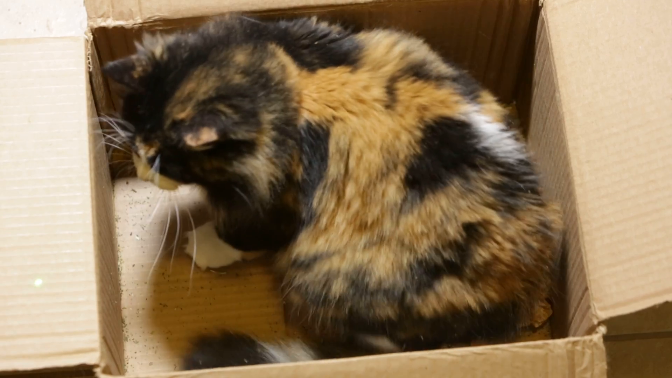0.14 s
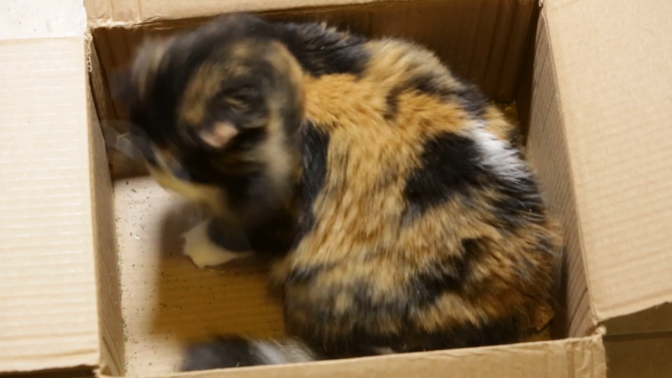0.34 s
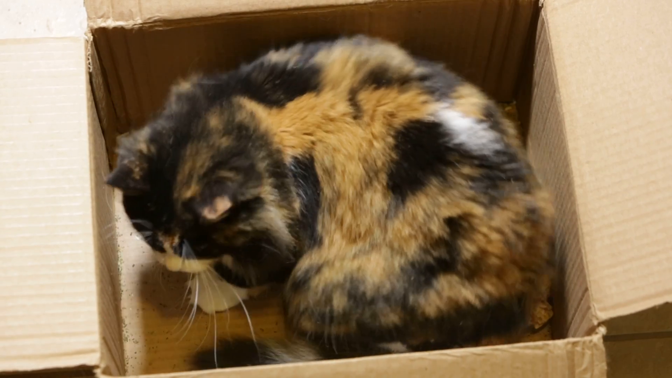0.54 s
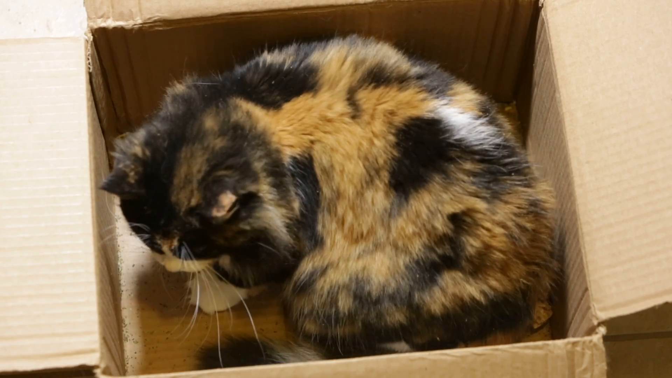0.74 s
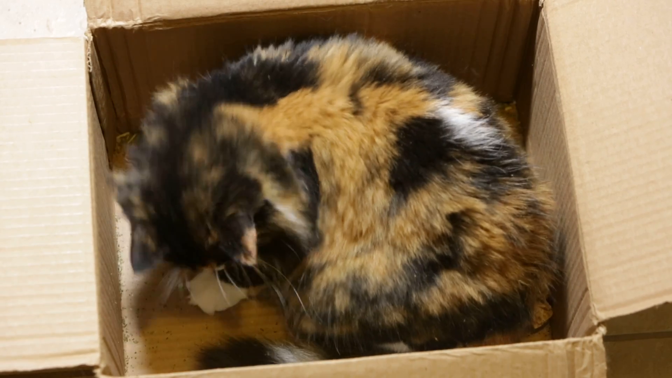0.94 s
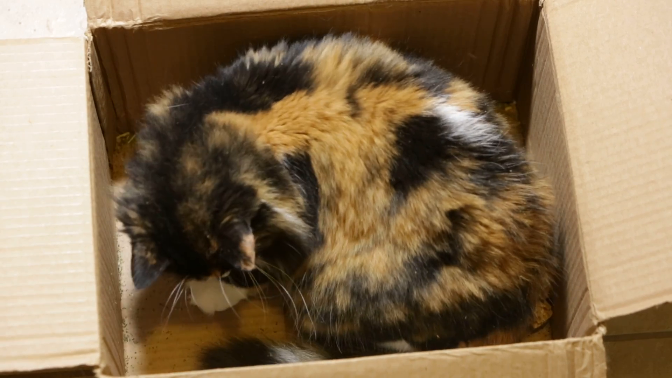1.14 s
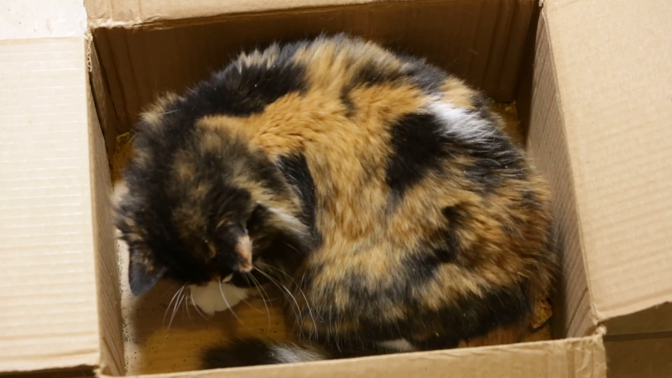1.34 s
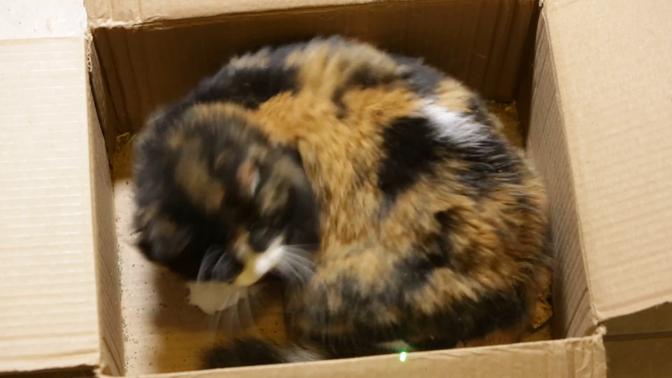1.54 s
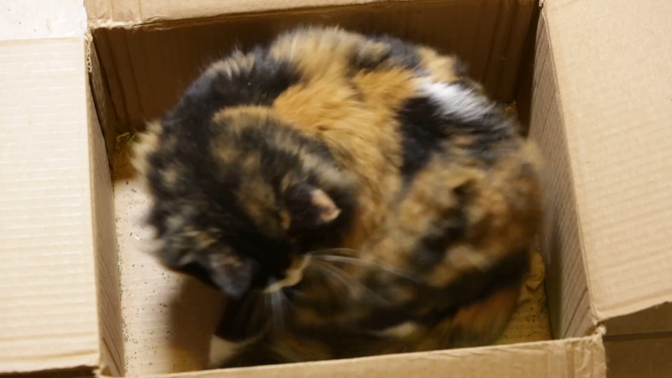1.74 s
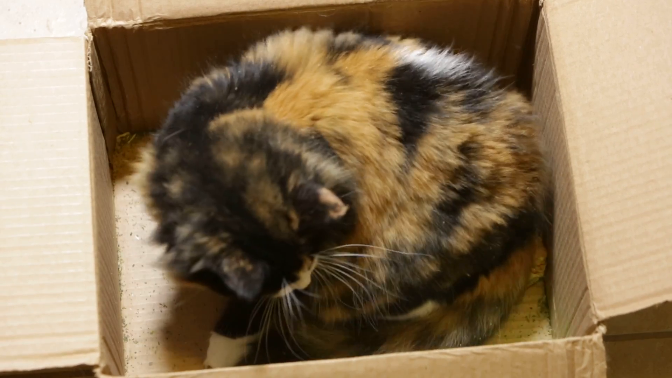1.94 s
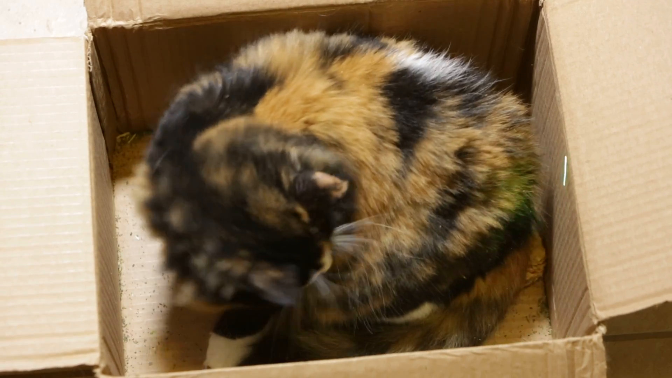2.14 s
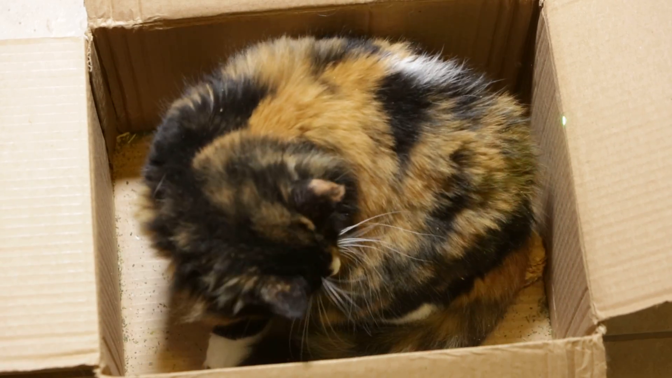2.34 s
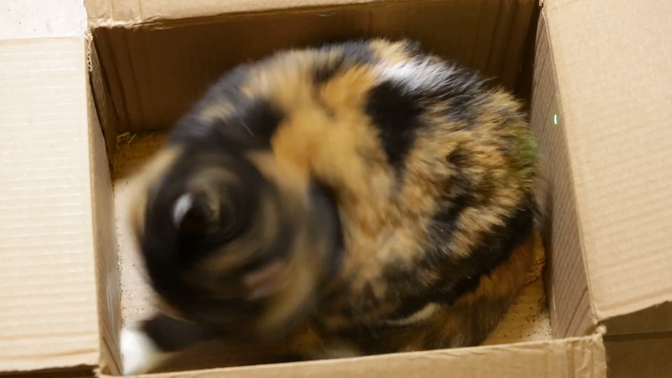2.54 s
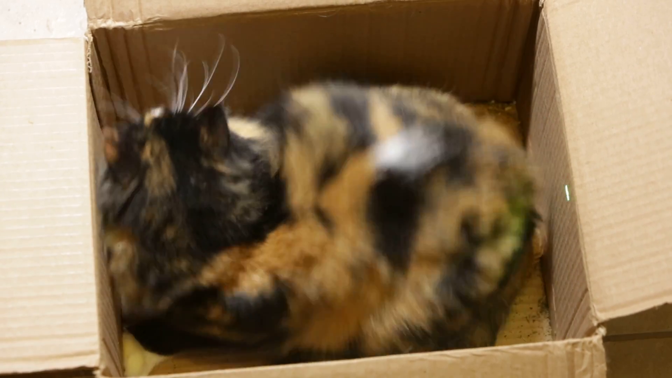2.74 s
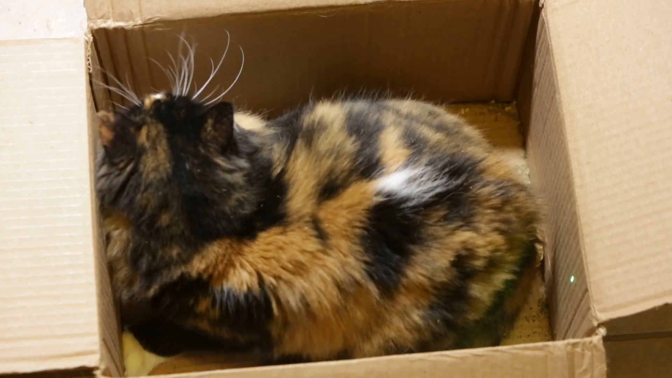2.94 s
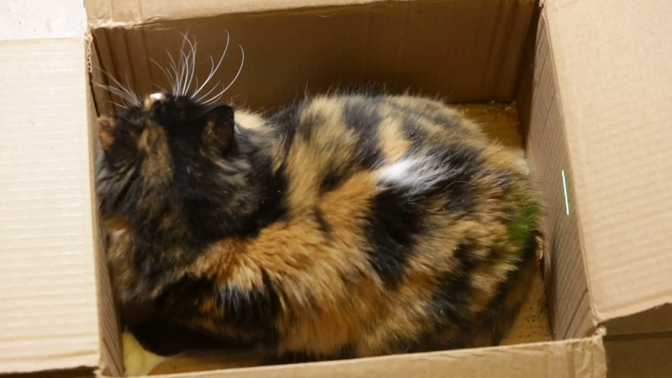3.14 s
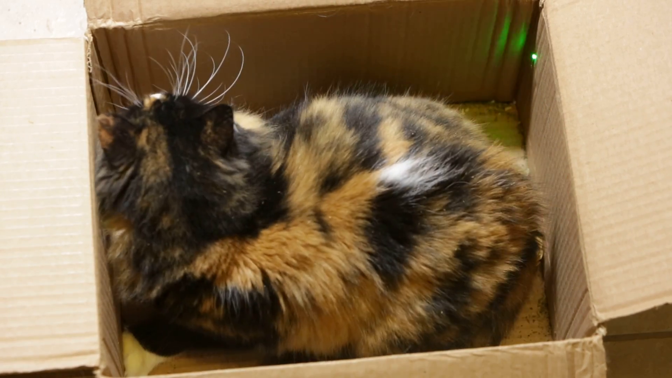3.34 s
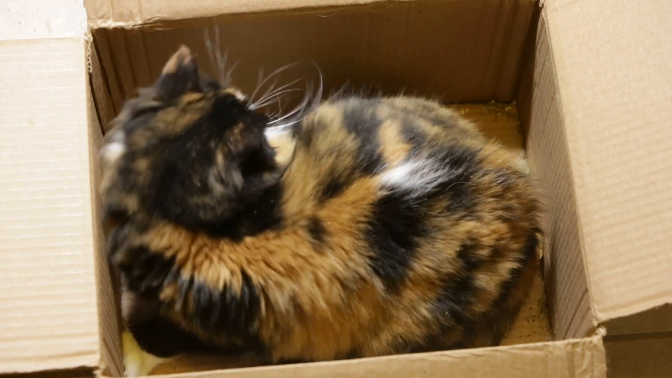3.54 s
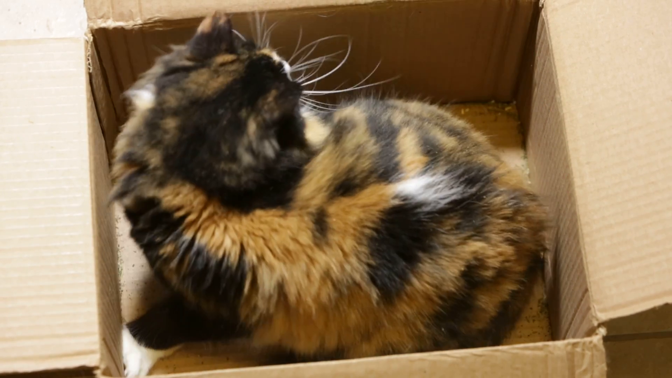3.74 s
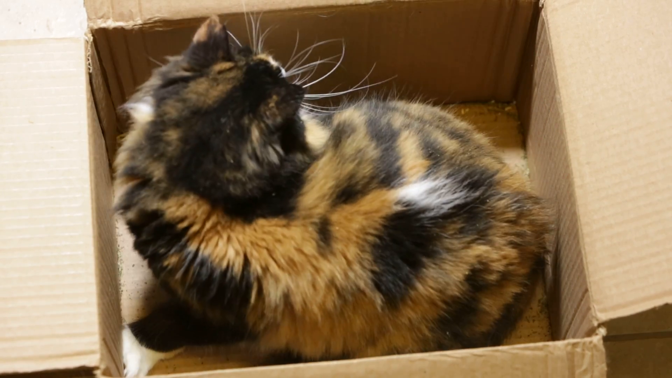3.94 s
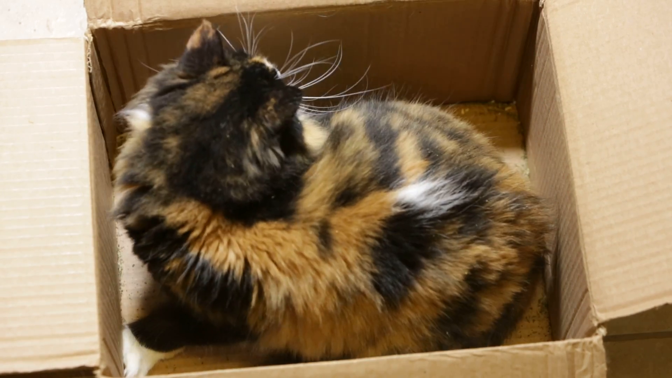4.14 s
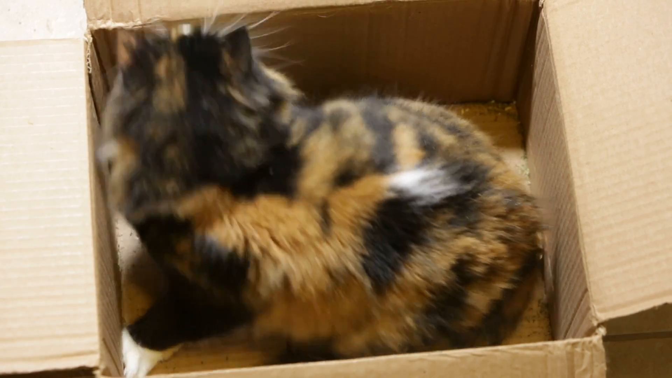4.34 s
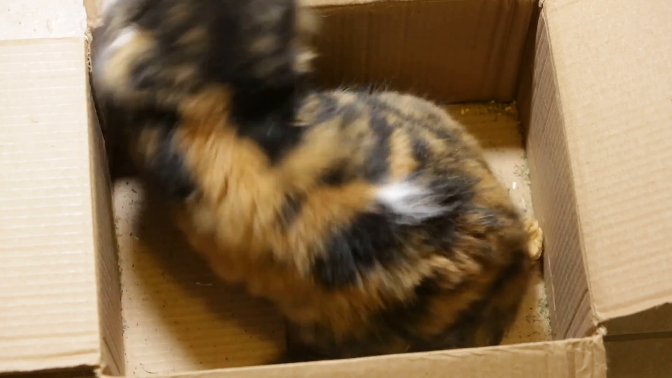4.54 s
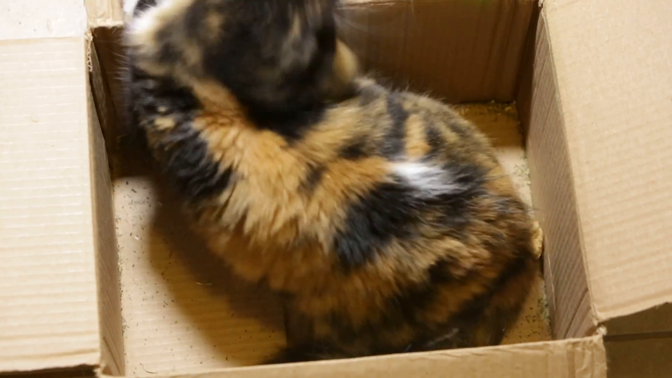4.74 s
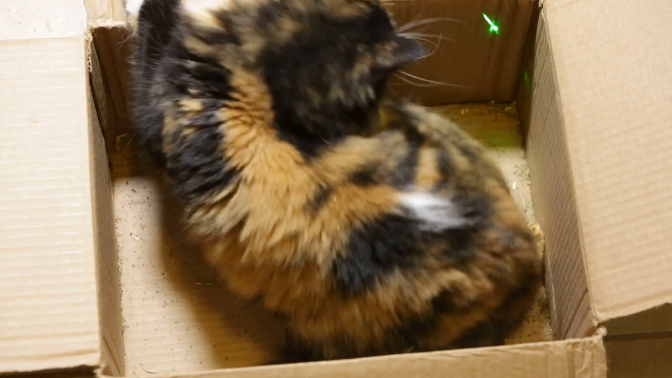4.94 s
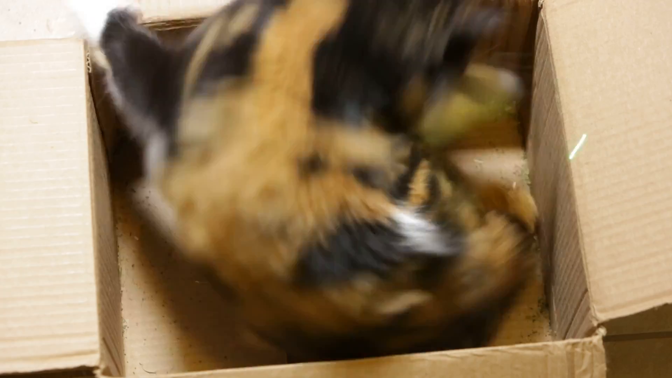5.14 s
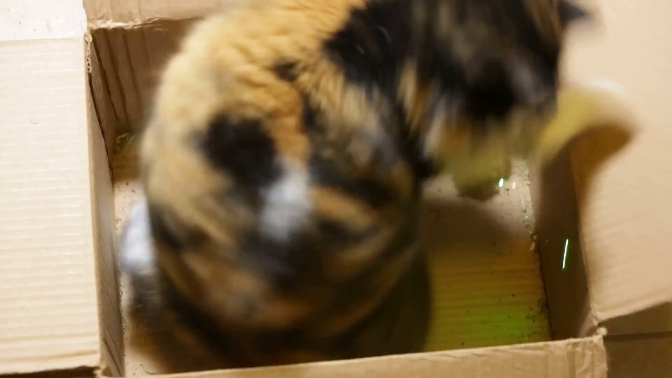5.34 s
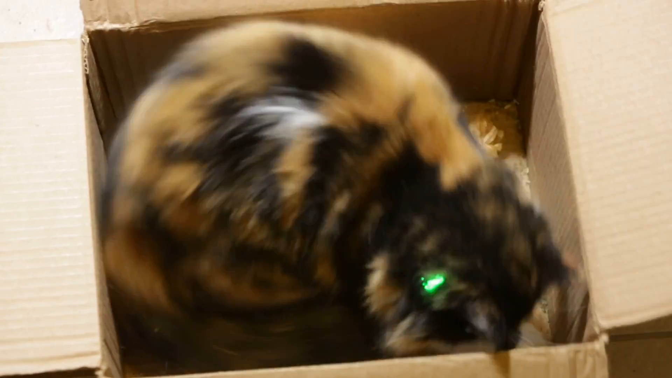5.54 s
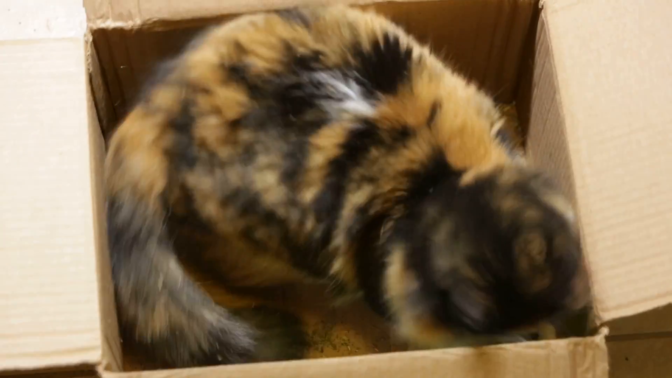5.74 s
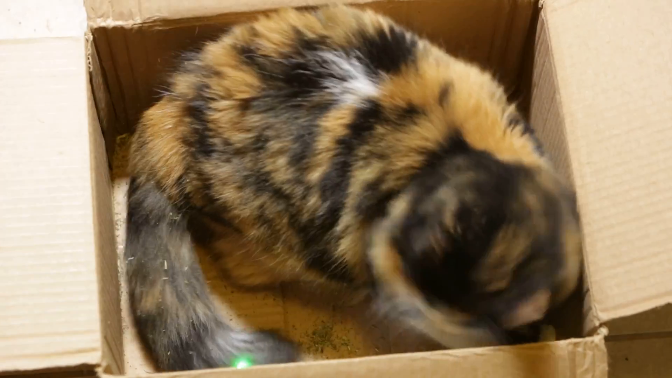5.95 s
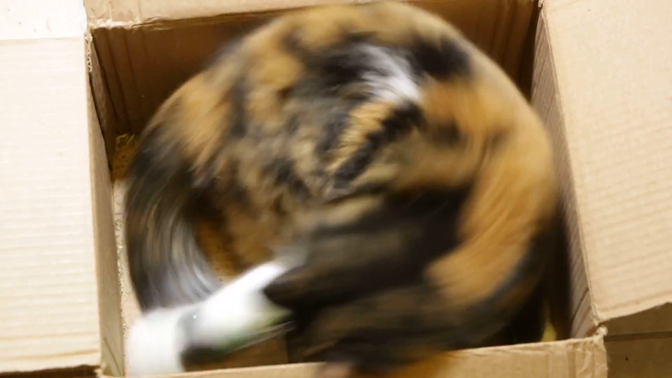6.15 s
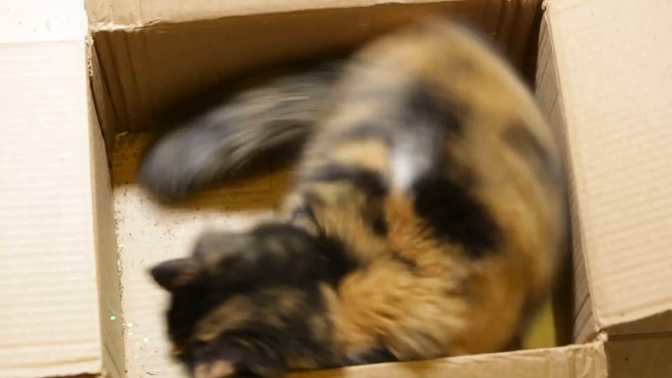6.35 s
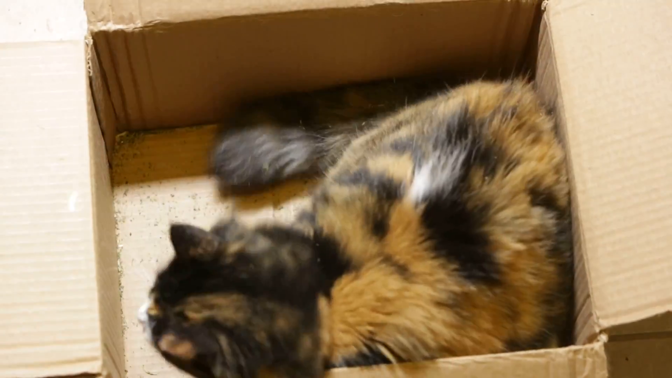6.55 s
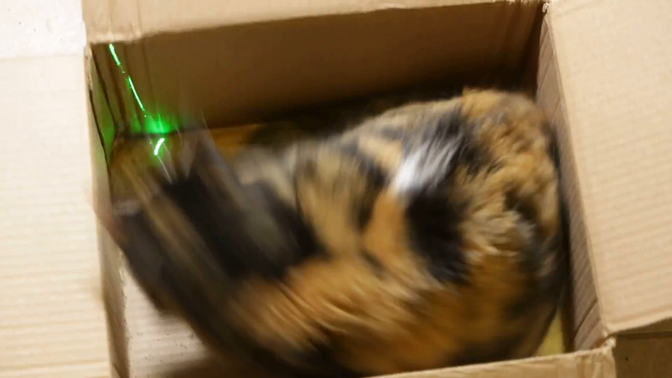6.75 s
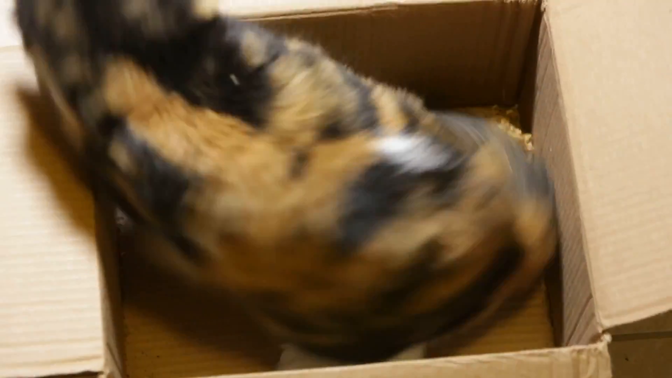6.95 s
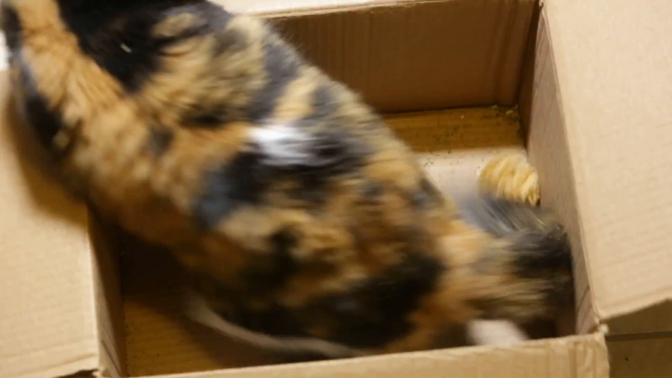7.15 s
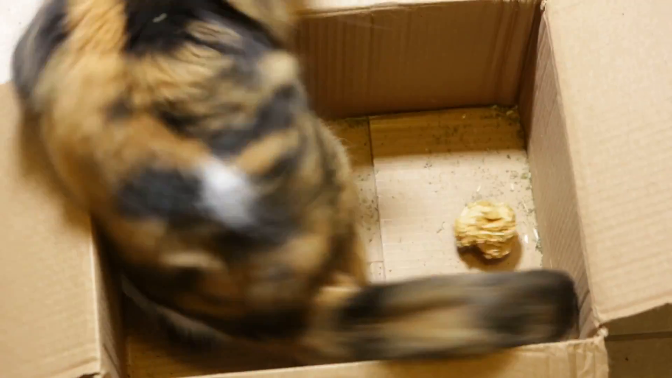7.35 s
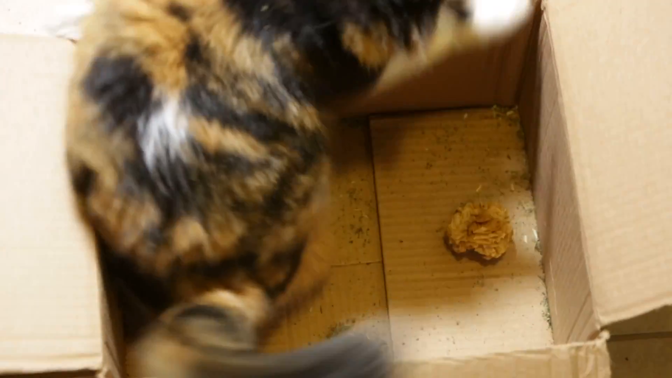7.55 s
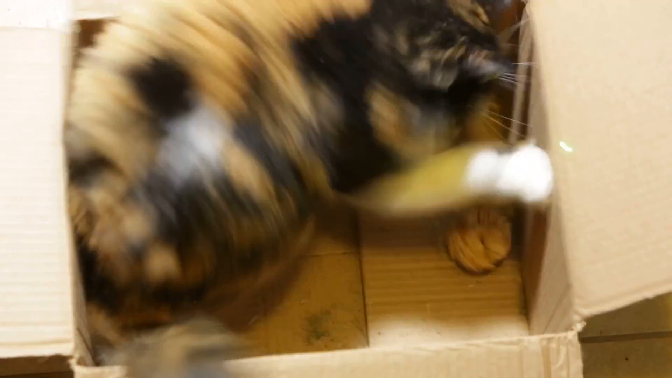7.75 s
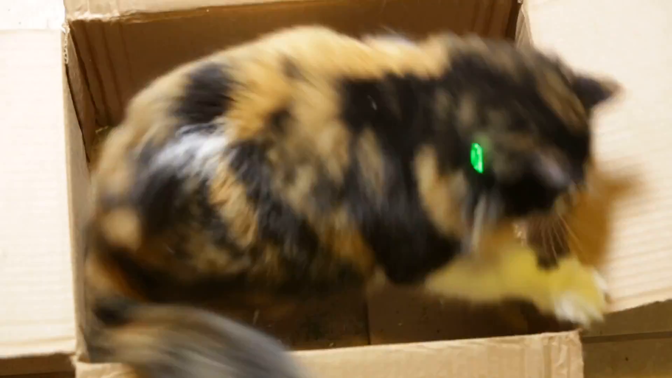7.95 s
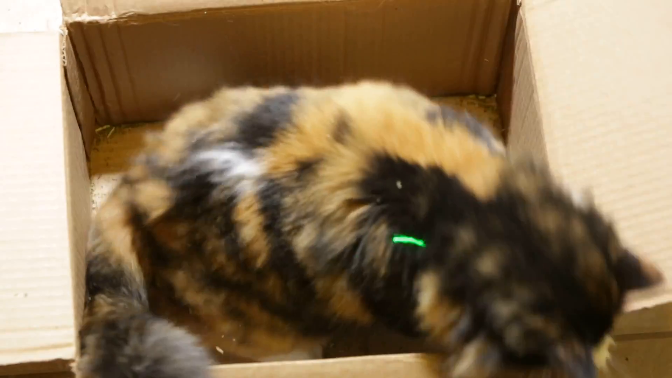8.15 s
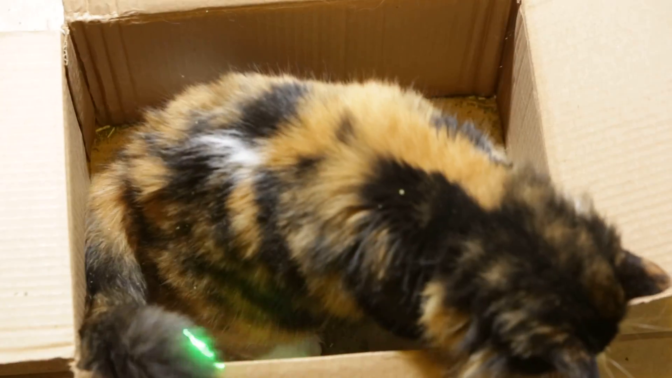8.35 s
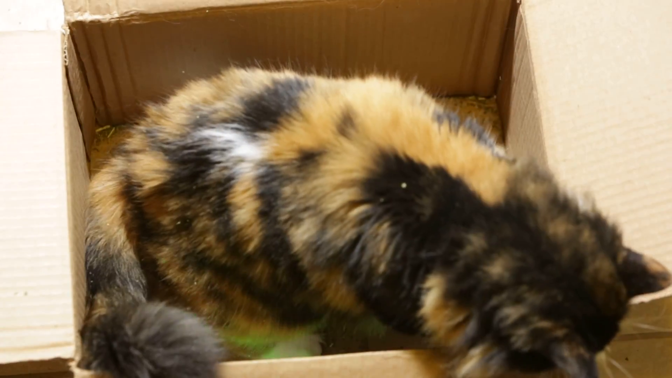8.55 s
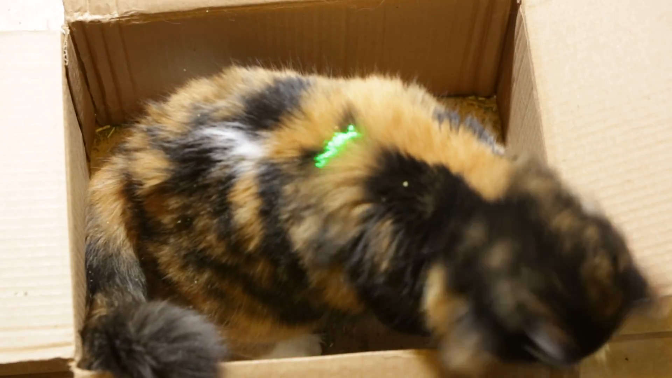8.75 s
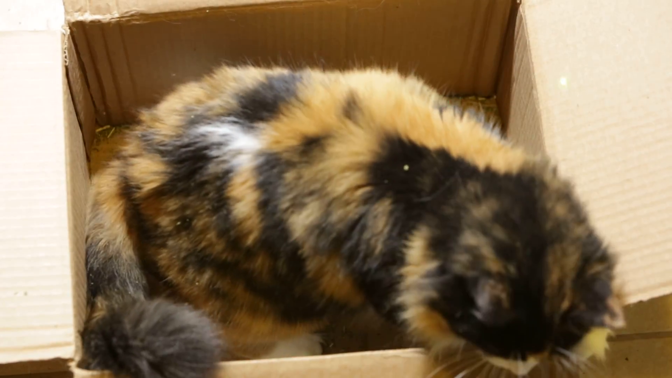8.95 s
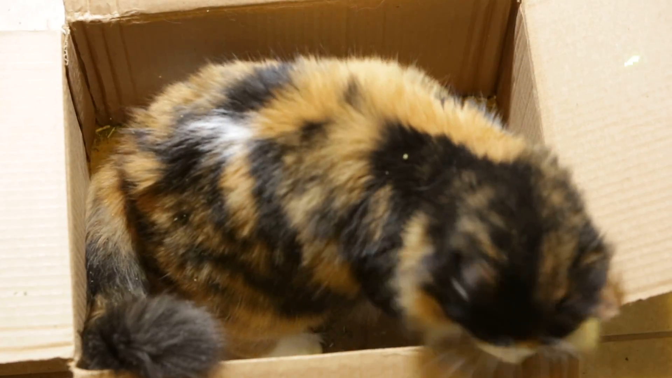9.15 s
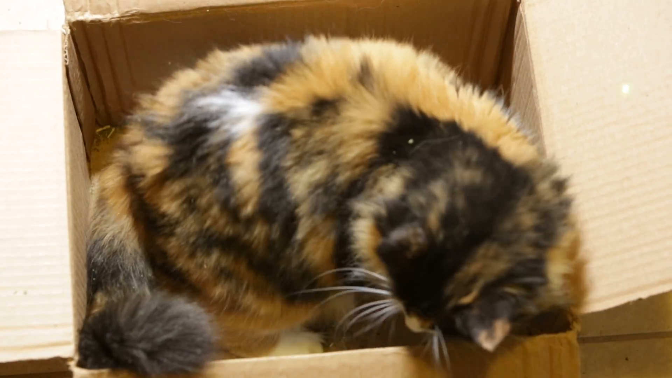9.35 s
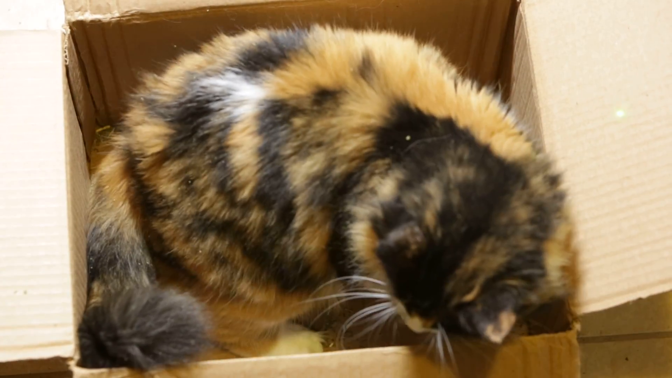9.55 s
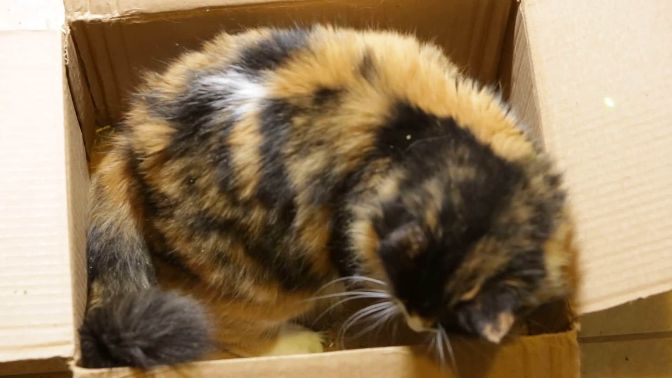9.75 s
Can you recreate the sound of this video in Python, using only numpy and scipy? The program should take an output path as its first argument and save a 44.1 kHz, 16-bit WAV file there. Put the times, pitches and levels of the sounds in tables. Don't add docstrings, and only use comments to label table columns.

```python
import sys
import numpy as np
from scipy import signal
from scipy.fft import rfft, irfft, next_fast_len
from scipy.io import wavfile
from scipy.ndimage import uniform_filter1d

SR = 44100
rng = np.random.default_rng(int(sys.argv[2]) if len(sys.argv) > 2 else 0)


def digitize_waveform(pressure):
    field = np.atleast_2d(pressure).T
    bounded = np.clip(field, -1, 1)
    quanta = np.round(bounded * 32767).astype(np.int16)
    wavfile.write(sys.argv[1], SR, quanta)


def field_ratio(decibels):
    return 10 ** (np.asarray(decibels, dtype=float) / 20)


N = 431738
T = np.arange(N) / SR


def unit(x):
    return x / np.sqrt(np.mean(x ** 2))


def resonate(x, hz, width_hz):
    return signal.lfilter(*signal.iirpeak(hz, hz / width_hz, fs=SR), x)


def colour(x, points):
    size = next_fast_len(len(x))
    hz, db = np.transpose(points)
    bins_hz = np.arange(size // 2 + 1) * SR / size
    gain = field_ratio(np.interp(np.log(bins_hz + 1), np.log(hz), db))
    return irfft(rfft(x, size) * gain, size)[:len(x)]


def walk(rate):
    knots = np.arange(int(T[-1] * rate) + 2)
    return np.interp(T * rate, knots, rng.standard_normal(len(knots)))


def grit(spread_db, flutter_db, rate):
    snaps_db = spread_db * np.minimum(rng.exponential(size=N), 6)
    return unit(rng.standard_normal(N) * field_ratio(snaps_db + flutter_db * walk(rate)))


def body(force, modes, wander_db):
    out = np.zeros(N)
    for k, (hz, width_hz, db) in enumerate(modes):
        sign = (-1) ** k
        out += sign * field_ratio(db) * resonate(force * field_ratio(wander_db * walk(9)), hz, width_hz)
    return out


# (time [s], length [s], level [dB], weight on the panel [dB], claws dug in [dB])
SWEEPS = [(.12, 0.49, -49, -5.5, 1), (1.536, 0.094, -60, 2, 8), (1.624, 0.071, -38, -11, 4),
          (1.739, 0.072, -37, -10, -2), (2.475, 0.064, -47.5, -13, 4.5), (2.711, 0.068, -32, -17, 0.5),
          (3.477, 0.35, -59, 1.5, 1.5), (4.291, 0.063, -44.5, -2, 2.5), (4.693, .3, -56, -3, 1.5),
          (4.966, 0.11, -52.5, -1, -3), (5.058, .2, -32.5, -12.5, 5.5), (5.321, 0.13, -33.5, 1, 1.5),
          (5.662, 0.082, -44.5, 9, 1), (6.057, 0.21, -42.5, -1.5, 3), (6.328, 0.095, -31, -5.5, -2.5),
          (6.692, 0.24, -34, -6, 3), (6.917, .28, -38, 0, 4.5), (7.37, .13, -35, -4.5, -3),
          (7.64, 0.089, -31, -10, 1.5), (7.731, 0.043, -26, -7, 1), (7.83, 0.076, -35, 7, 7),
          (7.95, 0.054, -22.5, -13, 5), (8.355, .12, -54, -0.5, -10), (9.152, 0.1, -54.5, -10, 2)]
SKIDS = [(0, 0.057, -45, -6, -1), (0.089, 0.017, -33.5, -9, -1), (0.3, 0.018, -56, -8, 8),
         (0.509, 0.062, -43, -3, -2), (1.807, 0.038, -36, -10, 3.5), (1.916, 0.059, -41.5, -3.5, -3),
         (2.31, .03, -57, -4, -1), (2.611, 0.046, -39.5, 9.5, -6), (4.406, 0.034, -33.5, 1.5, -3.5),
         (4.594, 0.037, -44, 6, 6), (5.264, 0.067, -34.5, 9, 7.5), (5.5, 0.073, -32, 11, 4.5),
         (5.79, 0.024, -31, -5, -5), (6.25, 0.036, -30, 10, -2), (6.885, 0.037, -29.5, -6, -1),
         (6.987, 0.035, -33, 2, -7), (7.232, 0.056, -27.5, -8, 0), (7.311, 0.043, -33, 8, 5.5),
         (7.521, 0.076, -31, 3, -0.5), (7.788, 0.04, -35.5, 1, 12), (8.069, 0.028, -25.5, -5.5, -3),
         (8.135, 0.02, -30, -5.5, 2.5), (3.001, 0.07, -62.5, -4, 5)]


def rub_levels():
    power, t = np.zeros((3, N)), T[:SR]
    strokes = [(*row, 0.023 + 0.22 * row[1], 0.31) for row in SWEEPS]
    strokes += [(*row, 0.0048, 0.36) for row in SKIDS]
    for start, length, db, weight_db, dug_db, rise_s, t60 in strokes:
        rise = np.sin(np.pi / 2 * np.clip(t / rise_s, 0, 1)) ** 2
        shape = rise * field_ratio(-60 * np.maximum(t - length, 0) / t60)
        rasp_db = 1 + 0.33 * weight_db + dug_db
        panel_db = 0.5 + weight_db
        layers_db = db + np.array([0, rasp_db, panel_db])
        span = power[:, int(start * SR):][:, :SR]
        span += (field_ratio(2 * layers_db)[:, None] * shape ** 2)[:, :span.shape[1]]
    return np.sqrt(power)


def scrapes(times, levels_db):
    power, t = np.zeros(N), T[:SR // 3]
    t60 = 0.096
    for start, db in zip(times, levels_db):
        power[int(start * SR):][:len(t)] += field_ratio(2 * (db - 60 * t / t60))
    return np.sqrt(power)


# (frequency [Hz], level per Hz [dB])
PAPER = [(1180, -11), (2000, -4.5), (3080, -5.5), (4130, -2), (4430, -1.5), (9540, -4.5), (15200, -16.5),
         (16100, -24), (16500, -46)]
# (frequency [Hz], width [Hz], level [dB])
SKIN = [(3250, 350, -16), (5000, 1800, -14.5), (6800, 1860, -6), (9920, 490, -33.5)]
# (time [s], peak [dB], brightness [Hz], scrape after it [dB])
CATCHES = [(.3084, -20, 4190, -18), (.413, -33.5, 4130, -8), (.5277, -17.5, 3780, -8.5),
           (0.564, -15, 4590, -13.5), (1.8115, -11, 6690, -12.5), (1.819, -13, 5890, -17),
           (1.923, -9.5, 4300, -16), (2.3092, -32, 5680, -14), (2.6194, -34, 3450, -18),
           (4.3211, -33, 5080, -8), (4.4096, -15, 4640, -10.5), (5.162, -13, 8550, -8.5),
           (5.268, -4, 2280, -38), (5.3244, -22, 3630, -6.5), (5.504, -12, 3410, -30),
           (5.5692, -11, 5340, -13), (5.713, -32, 3400, -0.5), (5.782, -15, 7440, -18),
           (5.8533, -21, 4640, -16), (6.2605, -16, 6270, -7), (6.349, -16.5, 3550, -10.5),
           (6.376, -21, 5100, -15), (6.766, -16, 6420, -9), (6.879, -15, 5790, -6), (7.004, -15, 5020, -6),
           (7.244, -6, 5250, -11.5), (7.5283, -8.5, 3110, -13.5), (7.8, 5, 2450, -42),
           (7.959, -13, 3250, -22), (8.135, -3.5, 5000, -14.5)]
# (time [s], peak [dB], brightness [Hz])
TICKS = [(.0945, -22, 5500), (.0995, -5, 5340), (.2384, -16, 7890), (1.5359, -39, 5580),
         (1.9358, -10.5, 5440), (1.9488, -18, 5910), (2.1066, -30.5, 5730), (2.4414, -33, 5480),
         (2.4867, -32, 6800), (4.442, -10.5, 9710), (4.6059, -32, 7850), (4.9761, -33, 5890),
         (6.0117, -35, 6650), (6.739, -32, 5000), (7.311, -15, 1506), (8.087, -7.5, 5970), (8.1, -11, 6500),
         (8.14, -21, 14000), (8.4044, -37, 5000), (8.4477, -34, 4960)]


def paper(rub):
    tick_scrape_db = -18.5
    contacts = [*CATCHES, *[(*tick, tick_scrape_db) for tick in TICKS]]
    times, peaks_db, bright_hz, after_db = np.transpose(contacts)
    hiss = colour(grit(2.65, 2.2, 60), PAPER)
    skin = unit(hiss + body(hiss[::-1], SKIN, 1.7))
    out = np.hypot(rub, scrapes(times, peaks_db + after_db)) * skin
    for start, peak_db, hz in zip(times, peaks_db, bright_hz):
        tear = rng.standard_normal(256) * np.exp(-T[:256] / 0.00066)
        tick = resonate(resonate(tear, hz, 0.39 * hz), hz, 1.3 * hz)
        out[int(start * SR):][:256] += field_ratio(peak_db - 4) * tick / np.abs(tick).max()
    return out


# (time [s], peak [dB], centre of the push [Hz], its width [share of the centre])
PADS = [(0.105, -27, 351, .8), (0.438, -35, 344, 1.8), (.527, -31, 259, 1.3), (1.933, -24, 348, 1.5),
        (2.618, -20, 396, 1), (2.646, -24, 400, 1), (4.409, -21, 260, 0.99), (4.443, -23.5, 347, 1.1),
        (4.47, -29, 364, 1.1), (5.163, -13, 332, 3.2), (5.349, -17, 340, 0.59), (5.394, -16, 347, 1.3),
        (5.569, -11.5, 374, 1.1), (5.792, -22, 258, 0.82), (6.283, -24, 400, .6), (6.359, -18, 640, 0.8),
        (6.904, -18, 380, 1.5), (6.975, -18, 344, 2.1), (7.334, -11.5, 349, 1.7), (7.527, -7.5, 230, 1.6),
        (7.551, -19, 316, 1.2), (7.67, -19, 346, 0.57), (7.758, -19, 320, 0.55), (7.795, -11.5, 303, 1),
        (8.08, -25, 385, 0.61), (5.535, -14, 228, 1.7), (1.77, -35, 295, 1.2)]
RAPS = [(.099, -22, 1460, 0.93), (.305, -32.5, 1120, 1.4), (.512, -29, 1420, 1.8),
        (1.669, -29.5, 1460, 1.2), (1.81, -18, 1720, 1.6), (1.919, -26, 1340, 1.2),
        (2.614, -24.5, 840, 0.74), (4.323, -30, 2020, 2.5), (4.601, -24, 1150, 0.65),
        (5.11, -18.5, 2740, 0.88), (5.184, -14.5, 1160, .6), (5.503, -3.5, 1028, 1.8),
        (5.534, -7, 1040, 1.9), (5.701, -20, 1100, 3.4), (5.853, -22.5, 1400, 1.4), (6.138, -25, 1620, .69),
        (6.169, -23.5, 1700, 1.2), (6.885, -15.5, 2310, 1.1), (7.002, -18.5, 1460, .94),
        (7.31, -9, 1135, 1.4), (7.849, -29, 1060, 1.4), (7.959, -9, 1066, 2), (8.134, -15, 1800, 1.2), ]
SLAPS = [
    (5.268, 0, 1040, 2),
    (7.799, -3, 1096, 2),
    (6.255, -10, 1200, 2.9),
]


def blows():
    force, spot, rough, t = np.zeros(N), np.zeros(N), grit(3.7, 1.0, 90), T[:SR // 5]
    hits = [(*row, -9, 0.14) for row in PADS]
    hits += [(*row, -10, 0.11) for row in RAPS]
    hits += [(*row, -10.5, 0.056) for row in SLAPS]
    for start, db, hz, share, rattle_db, t60 in hits:
        i, width_hz = int(start * SR), hz * np.clip(share, .2, 3)
        rattle = rough[i:i + len(t)] * field_ratio(rattle_db - 60 * t / t60)
        push = rattle * np.sqrt(SR / width_hz / 4)
        push[0] += .22 * SR / width_hz
        push = field_ratio(db) * resonate(push, hz, width_hz)
        force[i:i + len(t)] += push
        spot[i:i + len(t)] += field_ratio(-13.5) * push + field_ratio(12.0) * resonate(push, hz, 0.049 * hz)
    return force, spot


# (time [s], peak [dB], frequency [Hz])
THUDS = [(.546, -38.5, 80), (.599, -48, 75.4), (1.799, -40.5, 96), (1.949, -41, 89), (2.669, -32, 91),
         (4.427, -29.5, 95.3), (4.448, -31.5, 89.3), (4.619, -38, 92.4), (4.66, -49, 120),
         (5.179, -37, 79.5), (5.35, -30.5, 91), (5.569, -21, 119), (5.619, -26, 103), (5.8, -34, 117),
         (6.289, -28, 68), (6.893, -32, 111), (7.006, -40, 80.4), (7.338, -29.5, 92), (7.448, -30, 99),
         (7.524, -20, 80), (7.649, -28, 94.2), (7.789, -28, 86.1), (7.899, -31, 90), (7.978, -30, 118),
         (8.084, -29, 83), (8.298, -51, 68)]


def thuds():
    out, t = np.zeros(N), T[:SR // 3]
    cycles = 27
    ratios = rng.uniform(0.73, 1.363, len(THUDS))
    for (start, db, hz), ratio in zip(THUDS, ratios):
        swell = (1 - np.exp(-t / 0.0071)) ** 2 * field_ratio(-60 * t / (cycles / hz))
        swing = np.sin(2 * np.pi * hz * t) + 1.3 * np.sin(2 * np.pi * ratio * hz * t)
        out[int(start * SR):][:len(t)] += field_ratio(db - 8) * swell / swell.max() * swing
    return out


# (frequency [Hz], width [Hz], level [dB])
BOOM = [(71, 7.2, 0.5), (97, 21, -9), (123, 27, -5.5)]
PANEL = [(180.4, 28, -11.5), (265, 49, -4.5), (295.4, 52, -4), (363, 40, 0.5), (431, 58, -4), (502, 95, -5),
         (676, 110, -7.5)]
KNOCK = [(769, 150, -7.5), (910, 84, -2.5), (1042, 85, -2.5), (1234, 136, -0.5), (1490, 330, -4.5),
         (1764, 180, -2), (1960, 235, -3.5), (2510, 540, -7), (3210, 700, -8.5), (4300, 4200, -18)]


def box(rasp, panel):
    force, spot = blows()
    out = thuds() + spot
    for modes, rub in ((KNOCK, rasp), (PANEL, panel)):
        passed = np.sqrt(sum(field_ratio(2 * db) * np.pi * width_hz / SR for _, width_hz, db in modes))
        rubbing = rub * grit(3.0, 3.06, 55) / passed
        out = out + body(field_ratio(6.5) * force + field_ratio(0.5) * rubbing, modes, 1.92)
    shake = unit(resonate(body(rng.standard_normal(N), BOOM, 0.85), 90, 58.4))
    slow_weight = uniform_filter1d(panel, SR // 20)
    return out + field_ratio(-18.5) * slow_weight * shake


# (time [s], peak [dB], frequency [Hz], t60 [s])
TAPS = [(.5638, -28, 4500, .008), (2.628, -25, 754, .1), (2.619, -21, 400, .35), (5.2678, 4, 1700, .004),
        (5.271, -8.5, 1052, .06), (5.345, -22, 1900, .01), (5.392, -18, 1400, .012),
        (5.526, -9.5, 900, 0.017), (5.538, -9.5, 700, 0.019), (5.568, -9.5, 1100, .012),
        (5.58, -13.5, 1400, .015), (5.7128, -27.5, 3310, 0.038), (5.74, -27, 400, .06),
        (5.8539, -23, 1446, 0.037), (5.8535, -26, 4600, .015), (6.268, -13, 1610, .012),
        (6.286, -12, 450, 0.056), (6.303, -12.5, 478, .04), (6.319, -17, 522, .06), (6.368, -16, 400, .05),
        (6.39, -19, 402, .06), (6.411, -21, 380, 0.054), (6.905, -21, 700, .03), (7.004, -18, 1190, 0.0093),
        (7.311, -13.5, 1200, .06), (7.334, -11, 1500, .006), (7.343, -16, 330, .06),
        (7.538, -13.5, 298, .05), (7.548, -16, 618, .06), (7.567, -16, 300, 0.035), (7.7955, -9, 300, .04),
        (7.803, -8, 1060, .06), (7.96, -16.5, 1060, .06), (7.979, -13, 2200, .015), (8.0, -15, 2100, .025),
        (8.021, -19, 2100, 0.022), (8.088, -19, 380, .06), (8.12, -21, 429, .08), (8.1345, -11, 1900, 0.01),
        (7.88, -21, 1750, .03), (7.905, -20.5, 370, .08), (4.601, -30.5, 800, .05),
        (5.19, -22, 1240, 0.054), (5.27, -12, 600, .04), (5.85, -41, 62, .3), (8.19, -42, 60, .4),
        (2.65, -34, 150, .2), (4.41, -30, 185, .15), (6.287, -16, 280, .1), (7.53, -17, 195, .15)]


def taps():
    out, t = np.zeros(N), T[:SR // 3]
    for start, db, hz, t60 in TAPS:
        ring = np.sin(2 * np.pi * hz * t) + 0.33 * np.sin(2 * np.pi * 1.31 * hz * t)
        out[int(start * SR):][:len(t)] += field_ratio(db - 60 * t / t60) * resonate(ring, hz, hz)
    return out


def stick_slip(rows, width):
    out, rough = np.zeros(N), grit(1.9, 2.0, 70)
    for start, length, db, from_hz, to_hz in rows:
        i, size = int(start * SR), int(length * SR)
        hz = np.geomspace(from_hz, to_hz, size)
        smooth = signal.butter(2, width * min(from_hz, to_hz) / 2, fs=SR)
        a = signal.lfilter(*smooth, rough[i:i + size])
        b = signal.lfilter(*smooth, rough[i - size:i])
        turn = 2 * np.pi * np.cumsum(hz) / SR
        band = unit(a * np.cos(turn) + b * np.sin(turn))
        out[i:i + size] += field_ratio(db) * np.sqrt(np.hanning(size)) * band
    return out


# (time [s], length [s], level [dB], from [Hz], to [Hz])
RAKES = [(5.272, .07, -25, 1900, 1500), (5.505, .09, -25, 2200, 1800), (6.254, .035, -24, 1600, 1500),
         (7.03, .19, -36, 1000, 1100), (2.73, .08, -38, 2400, 3000), (7.799, .022, -20, 2300, 2000),
         (5.1, .1, -35, 1500, 2300), (5.38, .08, -33, 1700, 2500), (5.19, .07, -34, 750, 700),
         (7.82, .12, -32, 1100, 1100), (5.56, .07, -29, 1500, 1800), (7.97, .08, -30, 2600, 2400)]


def claw_rakes():
    return stick_slip(RAKES, 0.6)


# (time [s], length [s], level [dB], from [Hz], to [Hz])
DRAGS = [(5.09, 0.11, -40, 2500, 1300), (5.18, 0.065, -32, 1250, 1070), (5.506, 0.0528, -24, 1080, 990),
         (7.08, .14, -39, 1350, 1240), (7.953, .05, -32, 1060, 1140), (6.28, .05, -28, 560, 480),
         (1.29, .2, -65, 4900, 5050), (8.14, .08, -37, 4600, 4200), (8.25, 0.28, -59, 410, 400),
         (5.2, .06, -33, 600, 548), (7.31, .03, -31, 1250, 1100), (5.12, .08, -36.5, 1150, 1200),
         (5.8, .06, -38, 1750, 1900), (6.43, .05, -41, 1800, 1750)]


def claw_drags():
    return stick_slip(DRAGS, 0.18)


# (time [s], length [s], level [dB], from [Hz], to [Hz])
SQUEAKS = [
    (1.285, .14, -62, 2900, 2800),
    (1.41, .09, -65, 2600, 2520),
    (9.178, .07, -59, 1120, 1100),
    (9.18, .04, -56, 1900, 1880),
    (8.22, .25, -57, 5000, 4950),
    (1.3, .15, -70, 12500, 12500),
]


def wall_squeaks():
    return stick_slip(SQUEAKS, 0.034)


# (frequency [Hz], t60 [s])
ROOM_T60 = [(100, 0.58), (400, 0.46), (1500, 0.69), (5000, 0.57), (12000, 0.45)]


def room(x):
    t, echo = T[:SR], 0
    hz, t60 = np.transpose(ROOM_T60)
    for f in 63 * 2. ** np.arange(9):
        band = unit(resonate(rng.standard_normal(SR), f, 0.94 * f)) * np.sqrt(f)
        echo = echo + band * field_ratio(-60 * t / np.interp(np.log(f), np.log(hz), t60))
    echo = echo * np.clip((t - .004) / 0.0046, 0, 1)
    return signal.fftconvolve(x, echo / np.sqrt(np.sum(echo ** 2)))[:N]


# (frequency [Hz], level per Hz [dB])
HUSH = [(12, -55.5), (20, -26), (102, -3), (189, -9.5), (244, -6), (305, -10.5), (332, -4.5), (506, -9.5),
        (729, -9), (1140, -12.5), (1430, -14), (15200, -26.5), (16500, -24)]


def hush():
    return field_ratio(-54.5 + .5 * walk(1.51)) * unit(colour(rng.standard_normal(N), HUSH))


def scene():
    hiss, rasp, panel = rub_levels()
    cat = field_ratio(-1.0) * (paper(hiss) + box(rasp, panel))
    cat = cat + taps() + claw_rakes() + claw_drags() + wall_squeaks()
    return (cat + field_ratio(-10) * room(cat) + hush())[None]


def band_limit(x):
    return signal.sosfilt(signal.butter(12, 16650, fs=SR, output="sos"), x)


def record(dry):
    clipped = np.clip(dry, -.95, .95)
    low_pass = signal.ellip(8, .2, 50, 15800, fs=SR, output="sos")
    mix = signal.sosfilt(low_pass, clipped)
    return band_limit(mix)


dry = scene()
out = record(dry)
digitize_waveform(out)
```